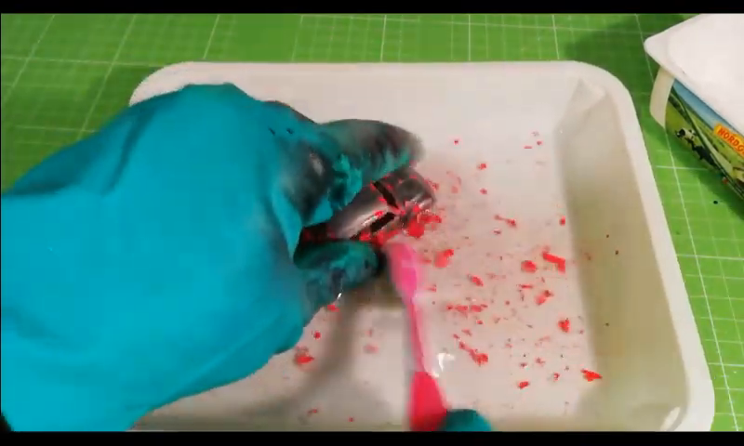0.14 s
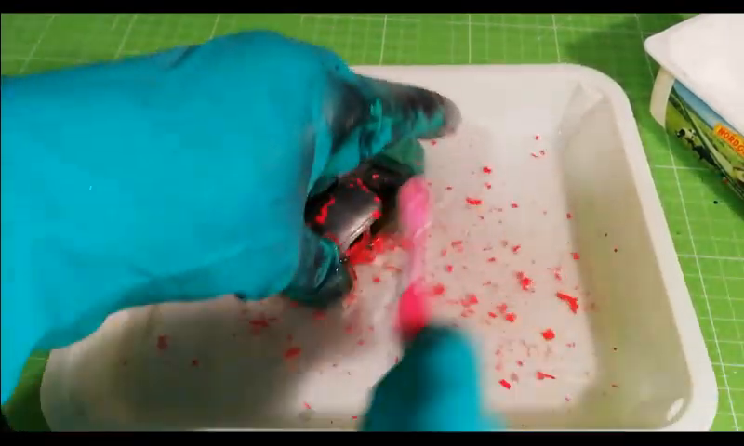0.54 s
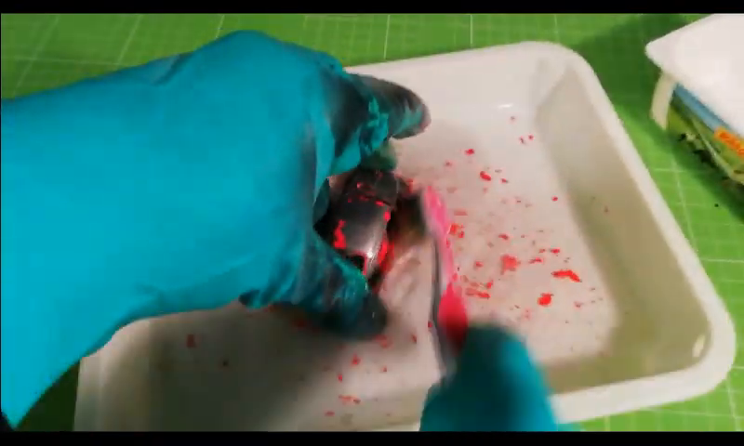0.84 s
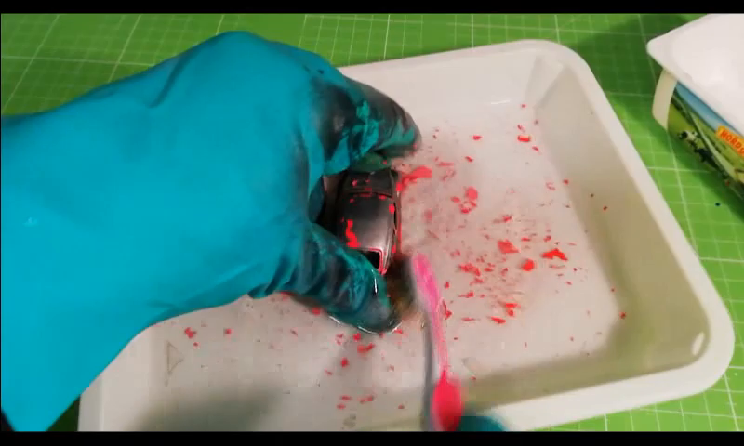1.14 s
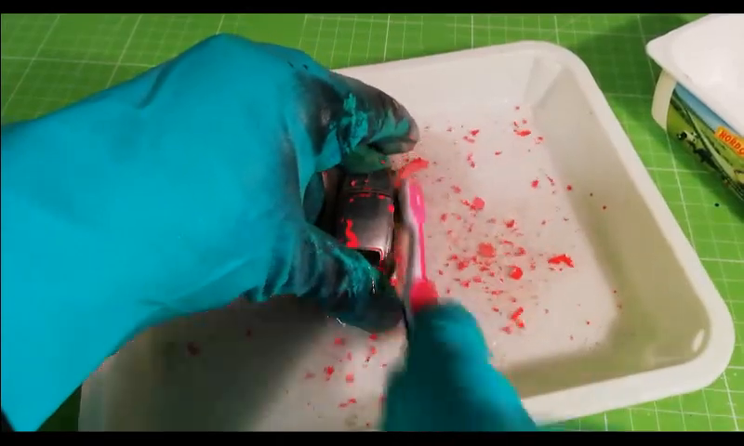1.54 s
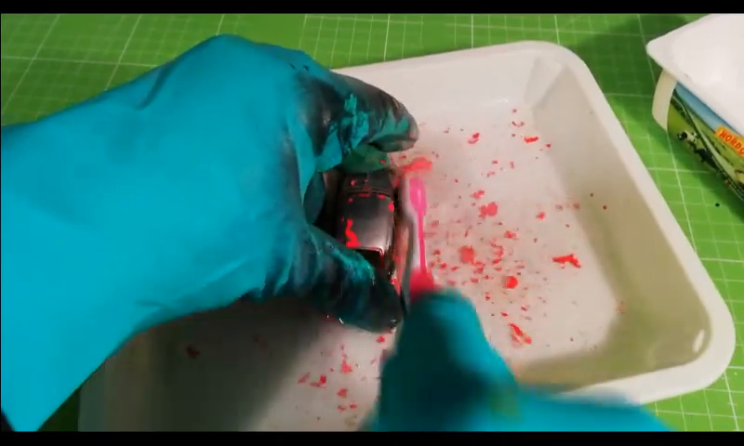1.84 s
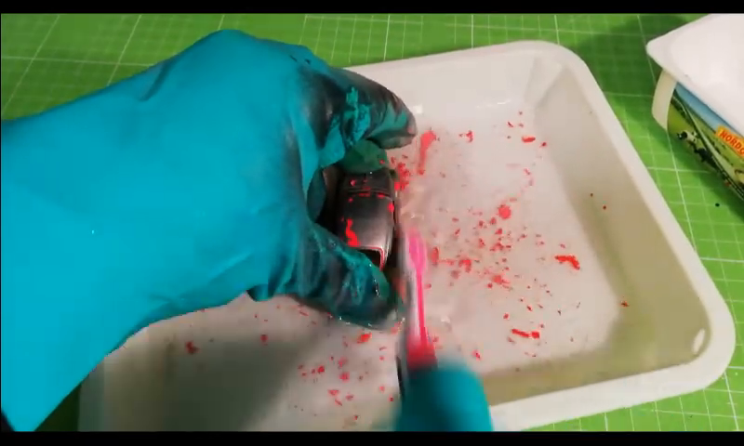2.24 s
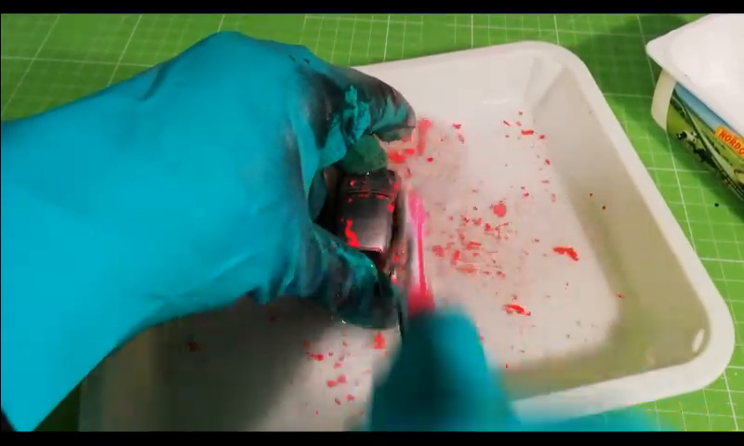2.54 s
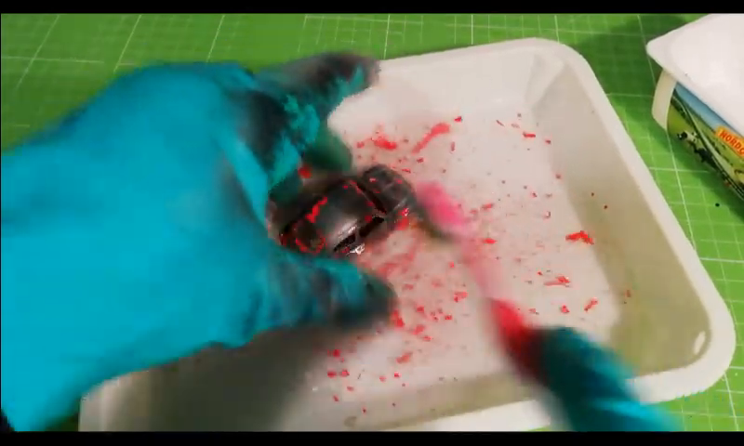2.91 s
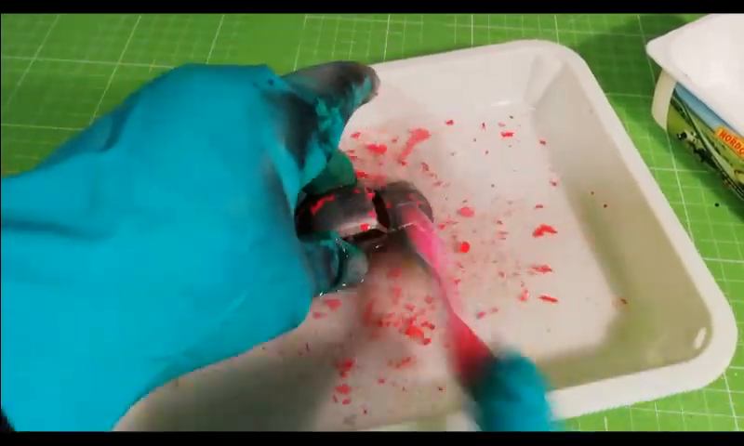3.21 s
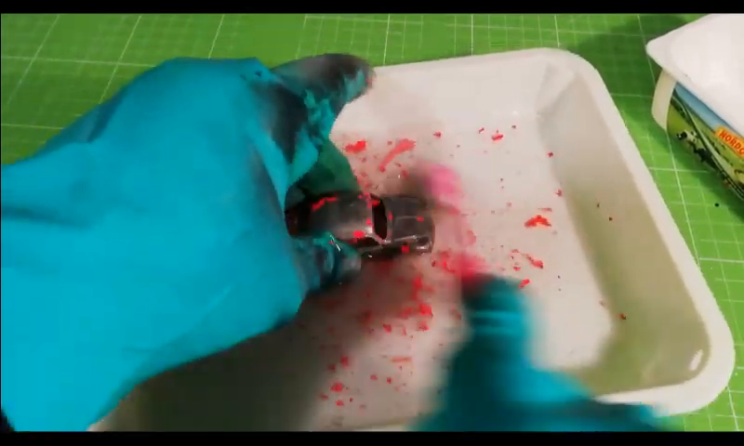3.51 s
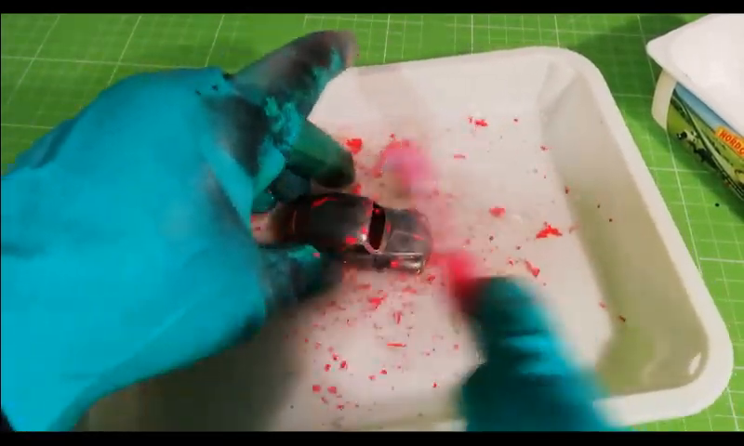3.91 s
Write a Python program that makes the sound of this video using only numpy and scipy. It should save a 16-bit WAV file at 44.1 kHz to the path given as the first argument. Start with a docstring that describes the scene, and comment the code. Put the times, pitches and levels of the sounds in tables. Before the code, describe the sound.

Thin, very bright bristle strokes scrape a little metal car, each swelling quickly and cutting off. Hollow plastic clacks of car against tray cluster at the start, thin out during regular back-and-forth scrubbing, and return in a pause as the car is moved; then firm separated strokes follow with one loud bump. Close microphone, slightly stronger highs on the right, small room, soft room tone.

```python
"""Toothbrush on a metal toy car

A toothbrush scrubs paste over a small metal model car in a plastic tray, close by: first mostly the flank, then the bonnet.
Rubs shape random bristle flicks and hiss, paste fizz, body rasp and tray rumble; skids add rumble.
Tufts snap as clicks with noisy stragglers; brush-head ticks and tray knocks are noise cracks over decaying modes.
Pushes swing two low work-top modes; a small room answers with decaying noise, over quiet room tone.
"""
import sys
import numpy as np
from scipy import signal
from scipy.fft import rfft, irfft, next_fast_len
from scipy.io import wavfile
from scipy.ndimage import uniform_filter1d, map_coordinates

SR = 44100
rng = np.random.default_rng(int(sys.argv[2]) if len(sys.argv) > 2 else 0)


def store_wav(level_fs):
    """Save 16-bit WAV to argv[1]."""
    pcm = np.round(np.clip(np.atleast_2d(level_fs), -1, 1) * 32767)
    wavfile.write(sys.argv[1], SR, pcm.T.astype(np.int16))


N = 179205

# colour of bristles on the flank: freq_hz, level_db
FLANK_TONE = [(500, -36), (2500, -29), (4500, -19), (5800, -11.5), (7300, -8.5), (8500, -3.5), (9300, 2.5),
              (10400, -1), (11400, -11), (12500, -14.5), (14000, -17.5), (16000, -18)]
# left port relative to right, all sources but the bonnet rubs: freq_hz, level_db
FLANK_SHADE = [(3000, -0.5), (4500, -1.5), (5800, -5.5), (8000, -4.5), (9300, -6), (10300, -9),
               (12000, -1.5), (16000, -1.5)]


def amp(db):
    """Decibels to gain."""
    return 10 ** (np.asarray(db) / 20)


def unit(x):
    """Scale to rms 1."""
    return x / np.sqrt(np.mean(x ** 2) + 1e-20)


def along(points, hz):
    """Interpolate (Hz, value) points on a log frequency axis."""
    f, v = np.transpose(points)
    return np.interp(np.log(hz + 1), np.log(f), v)


def wobble(rate_hz, size=16):
    """Smooth random curve with rate_hz knots a second."""
    coarse = np.arange(0, N + size, size)
    knots = rng.standard_normal(int(N * rate_hz / SR) + 4)
    curve = map_coordinates(knots, [coarse * rate_hz / SR])
    return np.interp(np.arange(N), coarse, curve)


def convolve(x, response):
    """Pass x through an impulse response, channel by channel."""
    return signal.fftconvolve(np.atleast_2d(x), np.atleast_2d(response), axes=1)[:, :N]


def colour(x, spectrum, size=4096):
    """Minimum-phase filter with the given (Hz, dB) shape, by folding the cepstrum."""
    log_gain = np.log(amp(along(spectrum, np.fft.rfftfreq(size, 1 / SR))))
    cepstrum = irfft(log_gain)
    cepstrum[1:size // 2] *= 2
    cepstrum[size // 2 + 1:] = 0
    return convolve(x, irfft(np.exp(rfft(cepstrum))))


def add(track, s, sound):
    """Mix a sound into a track at time s."""
    start = max(round(s * SR), 0)
    track[..., start:start + sound.shape[-1]] += sound[..., :N - start]


def ports(paths, lag_ms, scatter_db, shade=FLANK_SHADE):
    """Sum direct and scattered paths at two ports; the left lags and is shaded."""
    m = next_fast_len(N + 4096)
    hz = np.fft.rfftfreq(m, 1 / SR)
    left, right = rfft(paths[0] + amp(scatter_db) * paths[1:], m)
    left = left * amp(along(shade, hz)) * np.exp(-2j * np.pi * hz * lag_ms / 1000)
    pair = irfft(np.array([left, right]), m)[:, :N]
    # the mean of the ports keeps the level of the direct path
    return pair * np.std(paths[0]) / (np.std(pair.mean(0)) + 1e-20)


def room_tone():
    """Quiet room tone, partly shared by both ports, over an uneven low rumble."""
    # freq_hz, level_db
    tone_colour = [(20, 8), (50, -14.5), (75, -22), (100, -10.5), (150, -2.5), (280, -4), (450, -7),
                   (800, -18), (1600, -8.5), (3000, -17), (6000, -19.5), (10000, -14), (16000, -33)]
    rumble_colour = [(15, 4.5), (28, 14.5), (45, 8.5), (60, -1), (100, 6.5), (200, -40), (1000, -99)]
    tone = unit(colour(rng.standard_normal((3, N)), tone_colour))
    rumble = unit(colour(rng.standard_normal(N), rumble_colour))
    shared, separate = amp(-68.5) * tone[0], amp(-66.5) * tone[1:]
    return shared + separate + amp(-65.5 + 0.7 * wobble(4.38)) * rumble


def room(x, size=SR // 4):
    """Diffuse answer to the right port: decaying noise, fresh each quarter second as the hands move."""
    # decay of the room: freq_hz, t60_s
    decay = [(100, 0.084), (1000, 0.4), (5000, 0.36), (10000, 0.18), (16000, 0.29)]
    out = np.zeros((2, N))
    for start in range(0, N - size // 8, size):
        hz, t, z = signal.stft(rng.standard_normal((2, SR // 3)), SR, nperseg=256)
        fade = amp(-60 * t / along(decay, hz)[:, None])
        tail = signal.istft(z * fade, SR, nperseg=256)[1]
        answer = convolve(x[1, start:start + size], tail / np.linalg.norm(tail[0]))
        add(out, start / SR + 0.0054, answer)
    return out


def worktop(rise_s=0.0068):
    """The hand bears down and the work top swings in two low decaying modes."""
    # presses of the hand: start_s, level_db, upper_mode_db (added to the upper mode)
    pushes = [(0.638, -36.5, -11), (1.835, -43, -1.5), (2.116, -48, 6.5), (2.792, -62, 10), (3.05, -58, 9)]
    # modes of the work top: freq_hz, level_db, t60_s
    top_modes = [(38, -2, 0.3), (99, 0.5, 0.29)]
    out, t = np.zeros(N), np.arange(SR // 2) / SR
    for s, db, upper_db in pushes:
        swing = np.zeros(len(t))
        for k, (hz, mode_db, t60) in enumerate(top_modes):
            swing += amp(mode_db + k * upper_db - 60 * t / t60) * np.sin(2 * np.pi * hz * t)
        add(out, s, amp(db) * (1 - np.exp(-t / rise_s)) * swing)
    return out


def blow(modes, crack_db, crack_t60):
    """One contact on three paths, mean peak 1: a noise crack and decaying modes of varied strength."""
    t = np.arange(SR // 8) / SR
    ring = np.zeros((3, len(t)))
    for hz, db, t60 in modes:
        decay = amp(db + rng.normal(0, 2) - 60 * t / t60)
        ring += decay * np.sin(2 * np.pi * (hz * t + rng.random((3, 1))))
    sound = ring + amp(crack_db - 60 * t / crack_t60) * rng.standard_normal(ring.shape)
    return sound / np.abs(sound).max(axis=1).mean()


def knocks():
    """The car bumps the plastic tray: a hollow clack over a low thud; soft contacts are duller."""
    # car against tray: start_s, level_db, thud_db (relative), hardness_db
    bumps = [(.091, -28.5, -24, -6), (.197, -27.5, -41, -31), (.227, -32, -16, -31),
             (.607, -29.5, -33, -7.5), (.642, -33, -33, -3.5), (0.702, -22.5, -25.5, -14),
             (.818, -23.5, -25, -17), (.839, -27, -16, -20), (1.094, -31.5, -21, -25),
             (1.212, -32.5, -29, -32), (1.241, -42, -33, -23), (2.687, -32, -14.5, -12),
             (2.737, -31.5, -16, -11), (2.778, -29.5, -14, -10), (3.014, -30, -31, -12),
             (3.367, -40.5, -29, -14), (3.386, -36.5, -25, -6), (3.478, -18, -22.5, -25),
             (3.486, -20.5, -28, -10.5)]
    # modes of the tray floor, then of its whole shell: freq_hz, level_db, t60_s
    tray_modes = [(691, 1, 0.033), (793, -6, 0.034), (1070, -10, 0.044), (1339, 1, 0.03), (1450, -3, 0.079),
                  (1684, 3.5, 0.017), (1840, -5.5, 0.062), (2310, -23, 0.087), (2580, -24, 0.0067)]
    thud_modes = [(101, -48, 0.04), (286.4, -2.5, 0.11), (418, -3, 0.052)]
    out = np.zeros((3, N))
    for s, db, thud_db, hard_db in bumps:
        contact = [(100, -38), (400, -14), (650, -3), (1200, 1), (1900, hard_db / 4 + 4.5),
                   (2800, hard_db + 11), (6000, hard_db), (15000, hard_db)]
        clack = colour(blow(tray_modes, crack_db=11, crack_t60=0.08), contact)
        add(out, s, amp(db) * clack)
        add(out, s, amp(db + thud_db) * blow(thud_modes, crack_db=-26, crack_t60=.01))
    return ports(out, lag_ms=0.11, scatter_db=-3)


def ticks():
    """The hard brush head chatters on the car: two contacts 2.2 ms apart ring the metal modes."""
    # brush head against metal: start_s, level_db, low_body_db (relative)
    taps = [(0.4772, -24, 1.5), (.905, -24.5, -6), (2.642, -17, -32), (2.7356, -14, -3.5),
            (2.9732, -21.5, -5.5), (3.461, -28, -5), (4.0078, -31, 3)]
    # modes of the car body: freq_hz, level_db, t60_s
    metal_modes = [(1942, -11.5, 0.073), (3350, -6.5, 0.025), (3860, -11, 0.032), (6260, 0, 0.013),
                   (6880, -4, 0.039), (8570, -2.5, 0.017), (9550, -20, 0.012), (9500, -10.5, 0.016),
                   (12100, -12, 0.035)]
    out = np.zeros((3, N))
    for s, db, body_db in taps:
        contact = [(300, body_db - 26.0), (2000, body_db + 0.5), (3600, body_db + 2.5),
                   (5000, -7.5), (6300, 4.5), (10000, 7.5), (14000, -11)]
        for late_s, contact_db in [(0, -5), (.0022, -4.5)]:
            tap = colour(blow(metal_modes, crack_db=6.0, crack_t60=0.013), contact)
            add(out, s + late_s, amp(db + contact_db) * tap)
    return ports(out, lag_ms=0.164, scatter_db=7)


def scattered(clicks, t60):
    """Direct path, and a decaying noise spray off the tray walls to each port."""
    keep = amp(-120 / (t60 * SR))  # energy kept per sample
    energy = signal.lfilter([0, 1 - keep], [1, -keep], clicks ** 2)
    return np.vstack([clicks, np.sqrt(energy) * rng.standard_normal((2, len(clicks)))])


def snaps(straggle_db=-19, straggle_t60=0.029):
    """A whole tuft snaps off an edge as one click; decaying noise stands for the stragglers."""
    # tufts letting go: start_s, level_db
    tufts = [(.0575, -26), (0.112, -26), (0.4784, -20), (0.4865, -27), (0.667, -13), (0.6942, -18),
             (.7353, -28), (1.0549, -21), (1.0882, -13), (1.2192, -22.5), (1.5102, -24.5), (1.6946, -15),
             (1.7838, -20.5), (1.86, -23), (2.0047, -17), (2.3094, -14), (2.3388, -18), (2.3973, -18.5),
             (2.6268, -9.5), (3.066, -17), (3.165, -22), (3.1847, -15), (3.517, -12), (3.721, -33.5),
             (3.7339, -28), (3.7737, -19)]
    out, t = np.zeros((3, N)), np.arange(SR // 40) / SR
    for s, db in tufts:
        release = amp(straggle_db - 60 * t / straggle_t60) * rng.standard_normal(len(t))
        release[0] = 1
        snap = colour(scattered(release, t60=0.021), FLANK_TONE)
        add(out, s, amp(db) * snap / np.abs(snap[0]).max())
    return ports(out, lag_ms=0.099, scatter_db=-4)


def pressure_db(s, attack, hold, release):
    """One rub in dB below its top: it builds steadily, holds, then drops and trails off."""
    swing_db = 20  # gained over an attack, lost over a release
    release_bend = 0.75  # below 1: quick drop, slow trail
    t = np.arange(N) / SR
    before = np.maximum(s - t, 0) / attack
    after = np.maximum(t - s - hold, 0) / release
    return -swing_db * (before + after ** release_bend)


def gains():
    """Gains of flank bristles, bonnet bristles and rasp; one pressure drives all, the rasp less steeply."""
    # brush strokes, and at 2.777 s a faint rub as the car is lifted: full_pressure_s, attack_s, hold_s,
    # release_s, bristle_db, rasp_db, direction (0 = along the flank, 1 = across the bonnet)
    rubs = [(0.018, 0.0052, 0.01, .045, -43, -70, 0.95), (0.071, 0.022, 0.033, 0.12, -41, -53.5, .5),
            (0.355, 0.047, 0.047, 0.036, -64.5, -66.5, 0.014), (0.48, 0.027, .006, 0.056, -45.5, -57.5, 0),
            (0.631, .13, 0.053, 0.11, -39.5, -54.5, 0.22), (0.843, 0.084, 0.0068, 0.028, -48.5, -58, .2),
            (1.087, 0.084, 0.019, 0.06, -31.5, -51, 0.17), (1.215, 0.039, 0.058, 0.053, -44, -55.5, 0.0086),
            (1.386, 0.043, 0.035, 0.089, -33.5, -48.5, 0.18), (1.515, 0.018, 0.054, 0.079, -40, -51, 0.23),
            (1.688, 0.048, .044, .038, -29.5, -44.5, 0), (1.802, 0.022, 0.066, 0.085, -43.5, -47, 0.22),
            (1.998, 0.051, 0.04, 0.03, -30, -44.5, 0.067), (2.087, 0.022, 0.05, 0.14, -39, -44.5, 0.085),
            (2.307, 0.057, 0.023, 0.039, -29, -45, 0), (2.408, 0.017, 0.036, 0.19, -39.5, -44, 0.21),
            (2.626, 0.1, 0.02, 0.053, -31, -51, 0), (2.777, 0.033, .008, 0.011, -57, -55.5, 0.17),
            (3.061, 0.048, 0.038, 0.045, -29.5, -48.5, 0.93), (3.181, 0.029, 0.03, 0.052, -29, -58.5, 1),
            (3.244, 0.069, .025, 0.0079, -35.5, -64, 0.68), (3.516, 0.047, 0.041, 0.046, -28, -51, 0.98),
            (3.789, 0.037, 0.012, 0.069, -28, -46.5, 1), (4.015, 0.023, 0.027, 0.18, -34, -48, 0.92)]
    rasp_follows = 0.56  # dB of rasp per dB of bristle noise
    flank, bonnet, rasp = np.zeros((3, N))
    for s, attack, hold, release, bristle_db, rasp_db, direction in rubs:
        pressure = pressure_db(s, attack, hold, release)
        across = np.clip(direction, 0, 1)
        power = amp(bristle_db + pressure) ** 2
        flank += (1 - across) * power
        bonnet += across * power
        rasp += amp(rasp_db + rasp_follows * pressure) ** 2
    return np.sqrt([flank, bonnet, rasp])


def flicks(rate_hz, spread_db):
    """Single bristles let go at random moments with widely varying force."""
    force = amp(spread_db * np.clip(rng.standard_normal(N), -3, 2.2))
    return unit((rng.random(N) < rate_hz / SR) * force * rng.choice([-1, 1], N))


def steady(x, size=900):
    """Even out the level over 20 ms so that the rub gain sets the slow loudness."""
    return x / np.sqrt(np.abs(uniform_filter1d(x ** 2, size)) + 1e-9)


def sweeping(x, echo_db, delay_ms, travel, count=2):
    """Single bounces off the tray walls, whose delay drifts as the hands move."""
    out = x.copy()
    for k in range(count):
        delay = (k + 1) * delay_ms / 1000 * SR * np.exp(travel * wobble(3))
        out += amp(echo_db) * x[np.clip(np.arange(N) - delay.astype(int), 0, N - 1)]
    return out


def patchy(x, patchy_db):
    """The colour shifts at random in time and frequency as the brush travels over the body."""
    z = signal.stft(x, nperseg=512)[2]
    field = uniform_filter1d(rng.standard_normal(z.shape[1:]), size=12, axis=0)
    field = uniform_filter1d(field, size=9, axis=1)
    return signal.istft(z * amp(patchy_db * unit(field)), nperseg=512)[1][:, :N]


def friction(gain, tone, rate_hz, spread_db, clump_db, hiss_db, walls_t60, patchy_db):
    """Flicks and fine hiss in clumps, scattered off the walls, coloured and scaled by the rub gain."""
    grains = flicks(rate_hz, spread_db) + amp(hiss_db) * rng.standard_normal(N)
    grains = steady(grains * amp(clump_db * wobble(220)))
    paths = np.array([sweeping(path, echo_db=-8, delay_ms=1.1, travel=.22)
                      for path in scattered(grains, walls_t60)])
    return gain * unit(colour(patchy(paths, patchy_db), tone))


def scrubbing():
    """Each rub flicks bristles, fizzes paste, rasps the body and shakes the tray; skids shake it too."""
    # colours of bonnet bristles, fresh paste, body rasp and tray rumble: freq_hz, level_db
    bonnet_tone = [(500, -57), (1500, -60), (2700, -32), (4000, -26.5), (5500, -19), (7000, -17),
                   (8500, -11.5), (9500, -6.5), (10300, -3.5), (11500, -11), (13000, -19), (16000, -29)]
    fizz_tone = [(1000, -60), (6000, -22), (9500, -5), (11300, 2), (13000, -4), (16000, -16)]
    rasp_tone = [(200, -31), (600, -11), (1000, -5), (1450, 3.5), (2000, 0.5), (2600, -1.5), (4000, 2),
                 (6500, -8), (10000, -12), (16000, -43)]
    rumble_tone = [(20, -29), (45, -2.5), (70, -19.5), (100, 4.5), (140, -9), (200, 1), (285, 10.5),
                   (380, -1), (520, -1.5), (750, 3), (1200, -19), (4000, -65)]
    # left port relative to right for bonnet rubs: freq_hz, level_db
    bonnet_shade = [(3000, 0.5), (5800, -6.5), (8000, -3.5), (9300, -11), (10300, -13), (12000, -1.5),
                    (16000, 2.5)]
    # car skids on the tray floor: full_level_s, hold_s, level_db
    skids = [(0.101, 0.031, -53), (0.6, 0.12, -56.5), (0.839, 0.029, -52), (1.054, 0.07, -53),
             (1.211, 0.039, -54.5), (1.535, 0.0097, -55.5), (1.704, 0.03, -45.5), (1.81, 0.037, -51.5),
             (2.055, .022, -52.5), (2.109, 0.018, -47.5), (2.416, 0.011, -50), (2.488, 0.0072, -50.5),
             (2.631, 0.02, -49.5), (2.771, 0.042, -53), (3.003, 0.024, -54.5), (3.489, 0.018, -47),
             (3.827, 0.017, -55), (3.955, 0.027, -55), (4.005, .025, -59)]
    skid_attack_s, skid_release_s = 0.009, 0.059
    fizz_db, fizz_fade_db_per_s = -6.5, 4.5  # relative to the bristles; fades as the paste is worked in
    rumble_db = -14  # under every rub, relative to the rasp

    flank, bonnet, rasping = gains()
    fizzing = np.hypot(flank, bonnet) * amp(fizz_db - fizz_fade_db_per_s * np.arange(N) / SR)
    skidding = np.max([amp(db + pressure_db(s, skid_attack_s, hold, skid_release_s))
                       for s, hold, db in skids], axis=0)
    shaking = np.hypot(amp(rumble_db) * rasping, skidding)

    along_flank = friction(flank, FLANK_TONE, rate_hz=1400, spread_db=7.0, clump_db=2.0,
                           hiss_db=-5, walls_t60=0.0085, patchy_db=1.2)
    over_bonnet = friction(bonnet, bonnet_tone, rate_hz=3100, spread_db=5.5, clump_db=2.0,
                           hiss_db=8, walls_t60=0.0042, patchy_db=0.35)
    fizz = friction(fizzing, fizz_tone, rate_hz=1300, spread_db=10, clump_db=5,
                    hiss_db=-11, walls_t60=0.011, patchy_db=-0.7)
    rasp = friction(rasping, rasp_tone, rate_hz=900, spread_db=1.5, clump_db=1.5,
                    hiss_db=1.5, walls_t60=0.019, patchy_db=2.6)
    rumble = friction(shaking, rumble_tone, rate_hz=400, spread_db=1.5, clump_db=2.5,
                      hiss_db=-18.5, walls_t60=0.018, patchy_db=1.56)
    return (ports(along_flank, lag_ms=0.12, scatter_db=2.5)
            + ports(over_bonnet, lag_ms=0.135, scatter_db=3.5, shade=bonnet_shade)
            + ports(fizz, lag_ms=0.108, scatter_db=1.5)
            + ports(rasp, lag_ms=0.11, scatter_db=6.5)
            + ports(rumble, lag_ms=0.42, scatter_db=-10.5))


def scene():
    """Brush, car and tray in the room."""
    work = scrubbing() + snaps() + ticks() + knocks()
    return work + amp(-14.5) * room(work) + worktop() + room_tone()


def record(dry):
    """Cut everything from the band limit up."""
    top_hz = 16000
    m = next_fast_len(N + SR // 2)
    passed = np.fft.rfftfreq(m, 1 / SR) < top_hz
    return irfft(rfft(dry, m) * passed, m)[:, :N]


dry = scene()
out = record(dry)
store_wav(out)
```